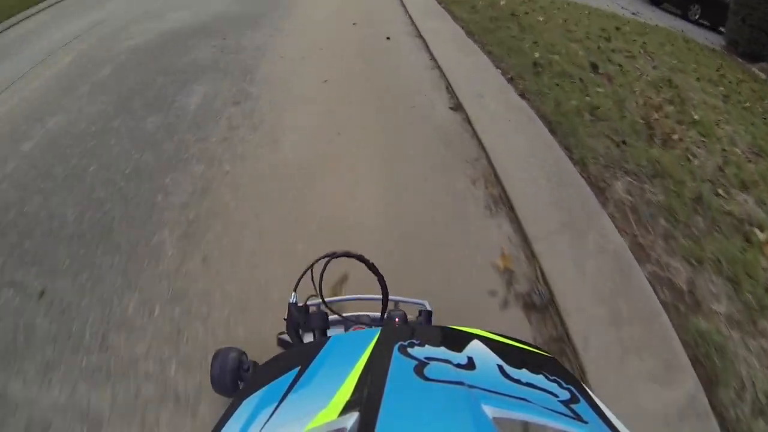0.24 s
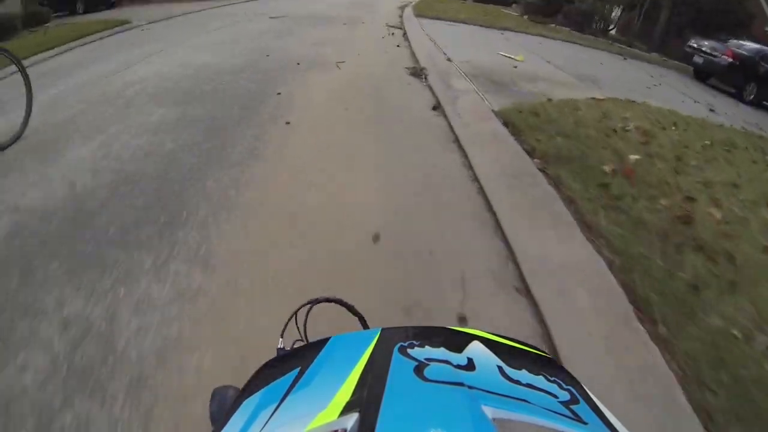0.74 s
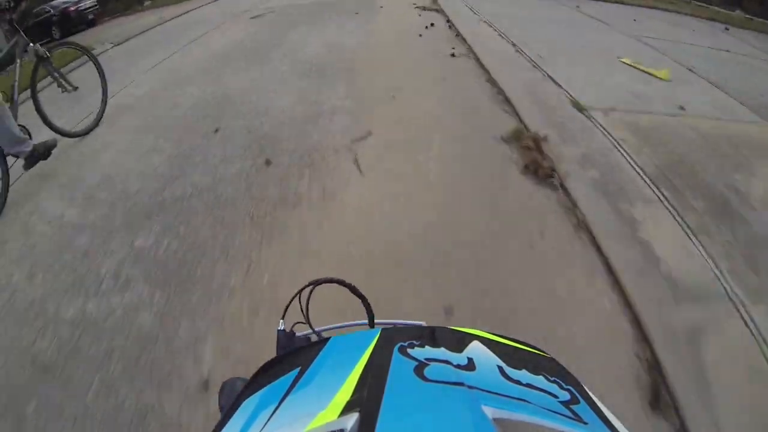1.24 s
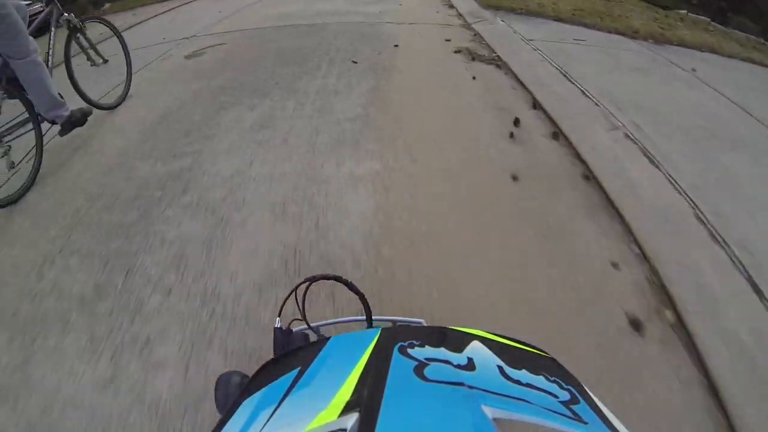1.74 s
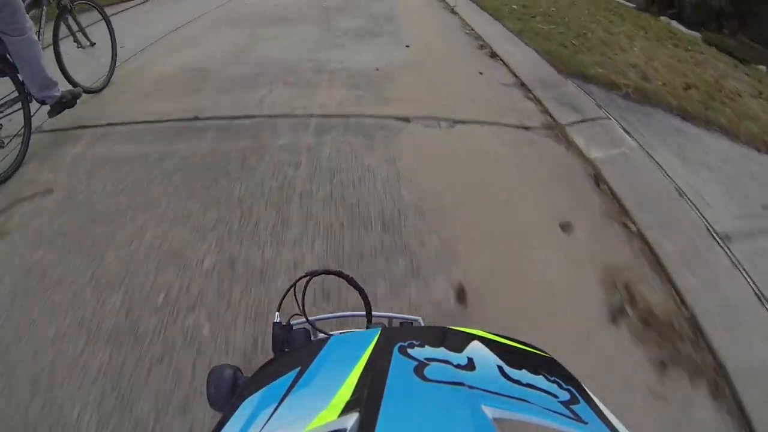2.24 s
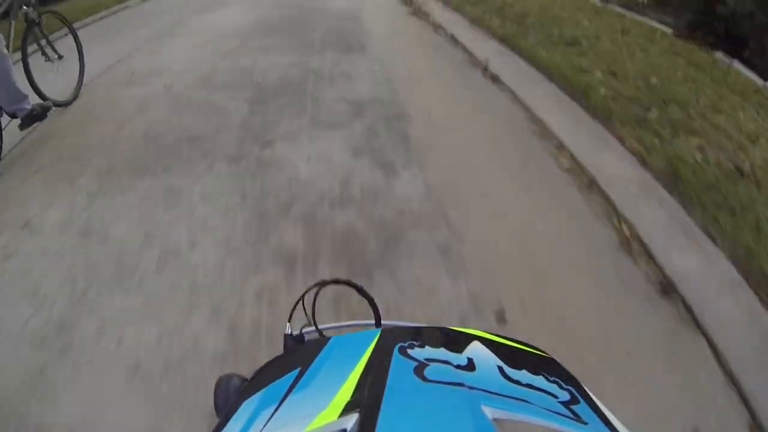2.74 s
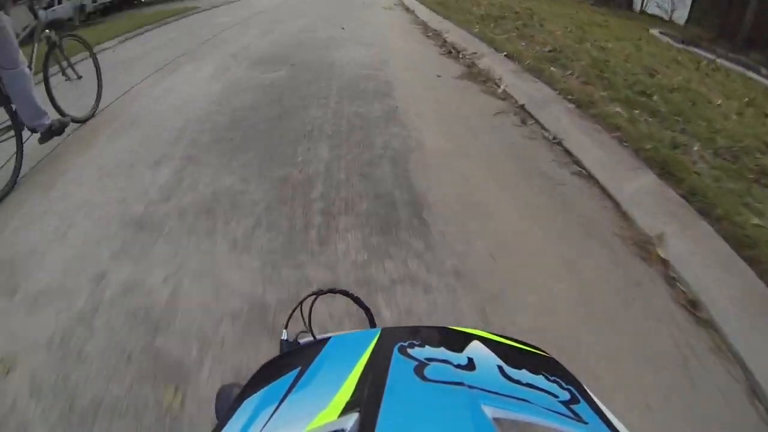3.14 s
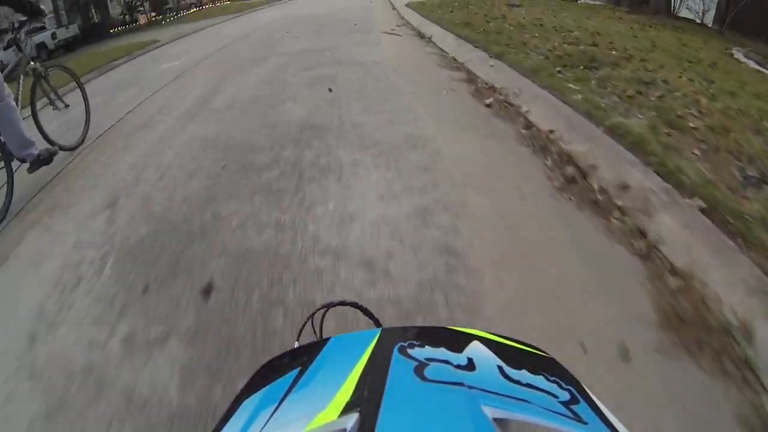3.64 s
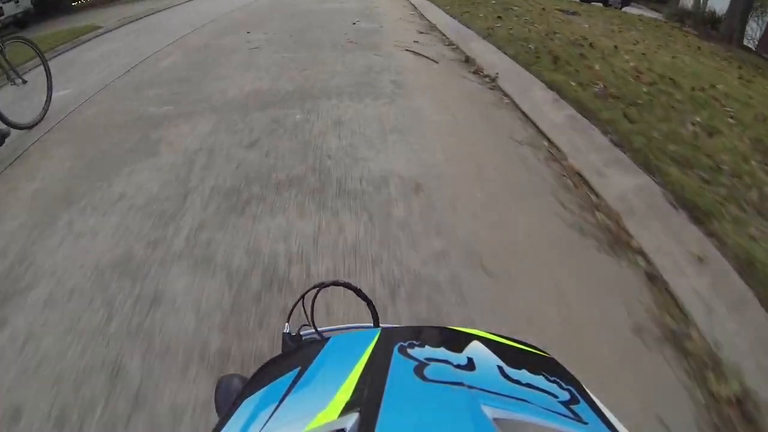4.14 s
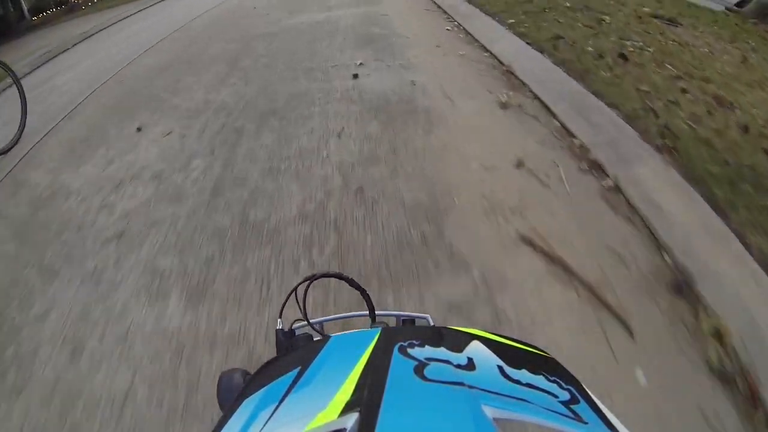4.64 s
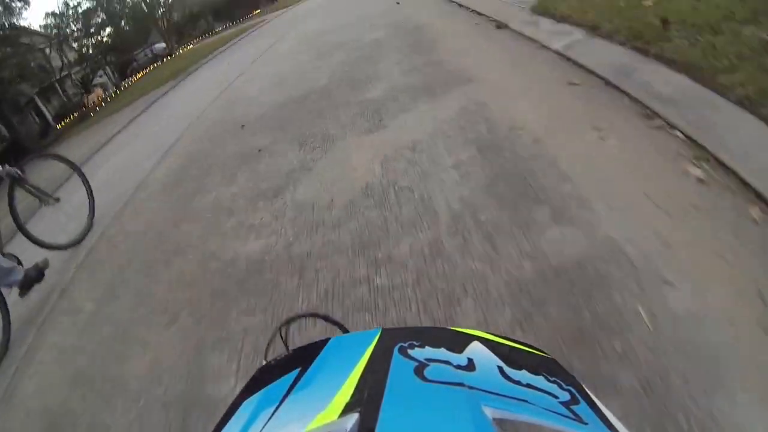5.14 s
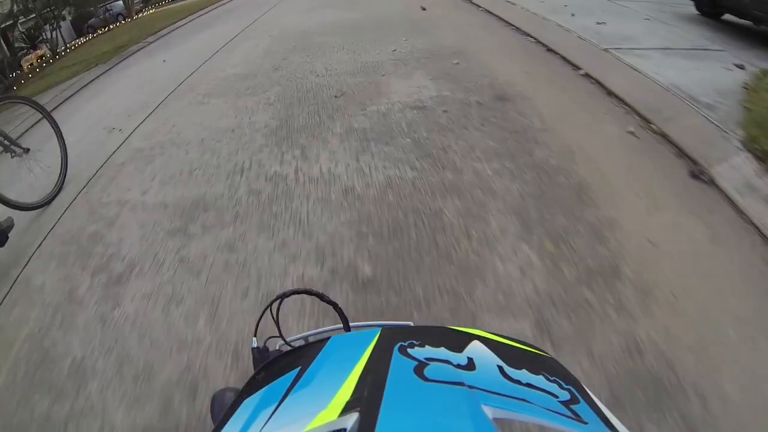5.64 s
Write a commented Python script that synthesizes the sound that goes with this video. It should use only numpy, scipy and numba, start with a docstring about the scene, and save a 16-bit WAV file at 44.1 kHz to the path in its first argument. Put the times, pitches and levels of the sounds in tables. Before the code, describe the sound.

An electric go-kart drives along a concrete street, heard from on board. Tyres drum steadily while plastic bodywork chatters and a chain jingles faintly. The motor whines in several pulls of the throttle, creeping upward in pitch. Bumps throw loose parts against the frame, with the hardest knocks and low booms near the middle. The whine drops out towards the end, leaving rumble, rattles and wind on the microphone.

```python
"""Tyres drum on rough concrete under a chattering fairing and a jingling chain: an electric go-kart,
heard from on board, with wind buffeting the microphone. Bumps throw loose parts against the frame
and leave low booms; once the frame hums faintly. The motor whines upward in pulls of the throttle,
and a limiter holds down the hardest jolts."""
import sys
import numpy as np
from scipy import signal
from scipy.fft import rfft, irfft
from scipy.io import wavfile
from scipy.ndimage import uniform_filter1d
from numba import njit

SR = 44100
rng = np.random.default_rng(int(sys.argv[2]) if len(sys.argv) > 2 else 0)


def transcribe(u):
    """Save the signal u as a 16-bit wav file named by the first command-line argument.

    u: samples, shape (n,) or (channels, n), limited to [-1, 1]; the rate is SR.
    q: integer samples, one column per channel.
    """
    v = np.clip(np.atleast_2d(u).T, -1, 1)
    q = np.round(v * 32767).astype(np.int16)
    wavfile.write(sys.argv[1], SR, q)


N = 259749


def undb(db):
    """Decibels to gain."""
    return 10 ** (np.asarray(db) / 20)


def unit(x):
    """Scale to rms 1."""
    return x / np.sqrt(np.mean(x ** 2))


def curves(table):
    """Columns of a timed table, linearly interpolated per sample."""
    times_s, *columns = np.transpose(table)
    return [np.interp(np.arange(N) / SR, times_s, column) for column in columns]


def drift(rate_hz):
    """Smooth random drift, rms 1."""
    step = max(int(SR / rate_hz), 1)
    held = np.repeat(rng.standard_normal(N // step + 1), step)[:N]
    return unit(uniform_filter1d(uniform_filter1d(held, step), step))


def contacts(per_s, scatter_db):
    """Random train of tiny, uneven impacts, rms 1."""
    hit = rng.random(N) < per_s / SR
    size = undb(scatter_db * np.clip(rng.standard_normal(N), -2, 2))
    return unit(hit * size * rng.choice([-1, 1], N))


def ring(force, modes, size=8192):
    """Force through a body's resonance clusters; minimum phase, unit power gain for white noise."""
    f = np.arange(size // 2 + 1) * SR / size + 1
    power = sum(undb(db) ** 2 / (1 + ((f * f - hz * hz) / (f * width_hz)) ** 2 / 3) ** 3
                for hz, width_hz, db in modes)
    cepstrum = irfft(np.log(power + 1e-12) / 2)
    response = irfft(np.exp(rfft(2 * cepstrum[:size // 2], size)))
    return signal.fftconvolve(force, response / np.linalg.norm(response))[:len(force)]


# Resonances of tyres, frame and seat: f/Hz, width/Hz, relative level/dB
FRAME_MODES = [(142.5, 35, -3), (228.5, 64, 0), (303, 39, 1), (345, 133, 0), (417, 58, -1), (491, 76, -1.5),
               (540, 64, -2), (615, 190, -7), (704, 56, -11.5), (839, 69, -4.5), (928, 72, -11.5),
               (1010, 100, -14), (1153, 70, -15), (1680, 870, -27)]


def tyres(rumble_db):
    """Concrete grain drums on the frame; the small wheels hop and load unevenly."""
    force = contacts(per_s=7000, scatter_db=1.5) * undb(rumble_db + 0.27 * drift(50) + 0.44 * drift(14))
    return ring(force, FRAME_MODES)


# Resonances of the plastic fairing and mount: f/Hz, width/Hz, relative level/dB
FAIRING_MODES = [(945, 390, 4), (1571, 240, 4.5), (1740, 170, -6.5), (1930, 262, 2.5), (2480, 390, -10),
                 (2918, 130, -7), (3120, 130, -9), (3326, 74, -9), (3590, 555, -14.5), (4810, 830, -23)]


def chatter(chatter_db):
    """Vibration keeps the fairing tapping in flurries over a gritty hiss."""
    flurry_db = 2.2 * drift(90)
    taps = contacts(per_s=900, scatter_db=-0.5) * undb(flurry_db - 4.5)
    grit = rng.standard_normal(N) * undb(-3.0)
    return ring((taps + grit) * undb(chatter_db), FAIRING_MODES)


# Resonances of chain, sprocket and fittings: f/Hz, width/Hz, relative level/dB
STEEL_MODES = [(5080, 320, 0), (6280, 690, -3.5), (8360, 690, -4), (9700, 1700, -12.5), (10500, 500, -16),
               (11100, 750, -11.5), (13260, 110, -8.5), (13000, 1300, -15.5)]
# Chain slaps on the sprocket: t/s, level/dB
CHAIN_SLAPS = [(0.07, -43.5), (0.375, -51), (0.885, -54), (1.17, -47), (1.2, -52), (1.218, -53),
               (1.985, -53), (2.252, -54), (2.345, -48), (2.383, -51), (2.5, -46), (2.665, -49),
               (3.019, -52), (3.245, -52.5), (3.63, -57), (3.83, -54), (3.905, -55), (4.425, -59),
               (4.46, -51), (4.59, -55), (4.89, -52), (4.915, -47), (4.966, -51), (5.044, -56),
               (5.178, -51), (5.37, -58), (5.868, -57)]


def jingle(chatter_db, offset_db=-31.5, slap_width_s=0.0068):
    """Shaken links and fittings tick, each resonance on its own, and swell at every chain slap."""
    t = np.arange(N) / SR
    shaking = undb(chatter_db + offset_db + 1.2 * drift(35))
    slaps = sum(undb(db) * np.exp(-((t - at_s) / slap_width_s) ** 2 / 2) for at_s, db in CHAIN_SLAPS)
    force = np.hypot(shaking, slaps) * undb(2.0 * drift(140))
    powers = np.array([width_hz * undb(db) ** 2 for _, width_hz, db in STEEL_MODES])
    out = np.zeros(N)
    for mode, share in zip(STEEL_MODES, powers / powers.sum()):
        ticks = unit(contacts(per_s=3600, scatter_db=3.0) * undb(2.5 * drift(30)))
        out += np.sqrt(share) * ring(ticks * force, [mode])
    return out


# Road shake, least where the wheels go light after a bump: t/s, rumble/dB, chatter/dB
ROAD_SHAKE = [(0.0, -16.5, -30.5), (0.23, -17.5, -30), (0.29, -24, -39), (0.38, -15.5, -23.5),
              (0.5, -20, -30), (0.7, -17, -29), (1.3, -17, -30), (1.95, -16, -29), (2.22, -17, -33),
              (2.27, -11.5, -24), (2.32, -17, -26), (2.49, -20.5, -27), (2.56, -22.5, -29.5),
              (2.7, -21.5, -33), (2.95, -16, -29), (3.3, -17, -32.5), (3.62, -18, -31), (3.9, -13, -27),
              (4.25, -18, -30.5), (5.1, -16.5, -30), (5.38, -15.5, -30), (5.62, -16.5, -27.5),
              (5.89, -20, -31)]


def rolling(patchy_db=1.39):
    """Coarse and smooth patches of concrete move rumble, chatter and jingle together."""
    rumble_db, chatter_db = np.array(curves(ROAD_SHAKE)) + patchy_db * drift(18)
    return tyres(rumble_db) + chatter(chatter_db) + jingle(chatter_db)


# Air on the microphone: t/s, level/dB
WIND_LEVEL = [(0.0, -27), (0.24, -33), (0.7, -23.5), (1.55, -22), (2.08, -16), (2.68, -30.5), (3.1, -22),
              (3.62, -18), (3.78, -22.5), (4.88, -20.5), (5.15, -26.5), (5.8, -18.5), (5.89, -18)]
# Eddy spectrum: f/Hz, relative density/dB
WIND_SPECTRUM = [(4, -36.5), (10, -9.5), (20, 5), (35, 2), (60, -1), (85, -5), (130, -11.5), (250, -33),
                 (800, -60)]


def wind(gust_db=0.9, gust_hz=9.6, cutoff_hz=1500):
    """Eddies at the microphone make a low, fluttering rumble."""
    (level_db,) = curves(WIND_LEVEL)
    hz, density_db = np.transpose(WIND_SPECTRUM)
    f = np.arange(N // 2 + 1) * SR / N + 1
    colour = undb(np.interp(np.log(f), np.log(hz), density_db)) / (1 + (f / cutoff_hz) ** 2)
    eddies = irfft(rfft(rng.standard_normal(N)) * colour, N)
    return unit(eddies) * undb(level_db + gust_db * drift(gust_hz))


def struck_spot(modes, detune=0.019, scatter_db=1):
    """A random point of contact shifts the pitch and strength of each resonance."""
    chance = np.clip(rng.standard_normal((len(modes), 2)), -2, 2)
    return [(hz * (1 + detune * a), width_hz, db + scatter_db * b)
            for (hz, width_hz, db), (a, b) in zip(modes, chance)]


def pits(per_s=5, clatter_db=-23, thud_db=-20.5, scatter_db=2.5, settle_s=0.016):
    """Pits and grit add small jolts at random; rows as in JOLTS."""
    chance = rng.random((64, 2))
    times_s = np.cumsum(0.5 + chance[:, 0]) / per_s
    sizes_db = scatter_db * (2 * chance[:, 1] - 1)
    return [(at_s, clatter_db + db, thud_db + db, 0, settle_s)
            for at_s, db in zip(times_s, sizes_db) if at_s + settle_s < N / SR]


# Jolts that throw loose parts against the frame: t/s, clatter/dB, thud/dB, hold/s, settle/s
JOLTS = [(0.037, -10, -9, 0.0052, 0.015), (0.079, -15, -12.5, 0.012, 0.028),
         (0.164, -18.5, -16, 0.041, 0.029), (0.217, -10.5, -10, 0.0085, 0.02),
         (0.323, -24, -14.5, 0.003, .012), (0.354, -18.5, -15, 0.022, 0.024),
         (0.4252, -10.5, -6, 0.0052, 0.0073), (0.645, -20, -16, 0.0053, 0.013),
         (1.042, -22, -17.5, 0.015, 0.0066), (1.1083, -15.5, -11.5, 0.031, 0.027),
         (1.1637, -12, -8.5, 0.012, 0.026), (1.197, -23, -12, 0.0092, 0.013),
         (1.2277, -19.5, -15.5, 0.0037, .008), (1.899, -18.5, -27, 0.0073, 0.017),
         (2.1197, -15.5, -8.5, 0.0016, 0.01), (2.2726, -3, -3, 0.0088, .0048),
         (2.345, -13.5, -8, 0.0093, 0.0096), (2.385, -17, -26, 0.0039, 0.0053),
         (2.432, -15.5, -10, 0.0034, 0.02), (2.486, -23.5, -19, 0.018, 0.028),
         (2.514, -13, -11.5, 0.013, 0.0059), (2.5834, -29, -11, 0, 0.013),
         (2.6485, -14.5, -4.5, 0.0034, 0.015), (2.8385, -30, -12, 0.0059, 0.0046),
         (2.9057, -16.5, -9.5, 0.0034, 0.019), (3.1755, -31, -15.5, 0.001, 0.013),
         (3.249, -23.5, -10.5, 0.0023, 0.023), (3.384, -24.5, -14.5, 0.014, 0.01),
         (4.205, -30, -11, 0.011, 0.0082), (4.3286, -22.5, -12, 0.016, 0.023),
         (4.564, -22.5, -11.5, 0.015, 0.025), (4.6454, -18, -11, 0.014, 0.018),
         (4.823, -18, -14, 0.0086, 0.0069), (4.9662, -9.5, -10.5, 0.01, 0.0082),
         (5.043, -13, -10.5, 0.0089, 0.02), (5.152, -16.5, -17.5, .028, 0.025),
         (5.188, -16.5, -14, 0.001, 0.013), (5.291, -22.5, -20, 0.032, 0.014),
         (5.345, -18, -21, 0.044, 0.024), (5.4422, -24, -13, 0.004, 0.011), (5.4575, -11, -7.5, 0, 0.014),
         (5.5765, -19, -6.5, 0.0011, 0.0065), (5.6222, -19, -22.5, 0.02, 0.017),
         (5.67, -18, -21, 0.0069, 0.021), (5.776, -12.5, -16, 0.0019, 0.017), (5.811, -23, -27, 0, 0.026),
         (5.857, -19, -14, 0.005, 0.0095), (5.872, -12.5, -15, 0.0071, 0.017)]


def jolts(rise_share=0.273, strike_s=0.0011, rebound_db=-5.5, clack_db=-22, knock_db=2):
    """A hard strike, then settling rebounds: the frame thuds, the fairing rattles, steel chinks."""
    clatter, thud, rattles, knocks = np.zeros((4, N))
    age = np.arange(SR // 5) / SR
    rebounds = contacts(per_s=7000, scatter_db=3.0)
    frame_hits = contacts(per_s=5900, scatter_db=3)
    steel_hits = contacts(per_s=7800, scatter_db=1.5)
    blow = np.sqrt(strike_s * SR)  # energy of strike_s of rebounds in one sample
    for at_s, clatter_db, thud_db, hold_s, settle_s in JOLTS + pits():
        rise_s = rise_share * settle_s
        start, strike = int((at_s - rise_s / 2) * SR), int((at_s + rise_s / 2) * SR)
        settling = np.exp(-np.maximum(age - hold_s, 0) / settle_s)
        burst = (np.minimum(age / rise_s, 1) * settling)[:N - start]
        span = slice(start, start + len(burst))
        clatter[span] += undb(clatter_db) * burst
        thud[span] += undb(thud_db) * burst
        knocks[strike] += undb(thud_db + knock_db) * blow
        force = undb(rebound_db) * burst * rebounds[span]
        force[strike - start] += undb(clack_db) * blow
        rattles[span] += undb(clatter_db) * ring(force, struck_spot(FAIRING_MODES), size=4096)
    thuds = ring(undb(-0.5) * thud * frame_hits + knocks, FRAME_MODES)
    chinks = ring(clatter * steel_hits, STEEL_MODES)
    return rattles + thuds + undb(-36.5) * chinks


# Single blows of fairing on frame: t/s, level/dB, pitch ratio
CLACKS = [(0.0397, -15, 1.05), (0.089, -12.5, 1.22), (0.181, -12, 1.06), (0.219, -9, 0.96),
          (0.358, -14, 1.16), (0.4273, -9, 0.86), (1.1085, -15, 0.8), (1.125, -10, 0.92), (1.167, -12, 1),
          (2.2722, -3.5, .96), (2.2758, -1.5, 1), (2.4312, -12, 1), (2.515, -14, 1), (2.649, -10.5, .85),
          (2.838, -19, .95), (4.648, -18, 0.87), (4.9697, -13, 1.03), (5.0497, -6, 0.91),
          (5.373, -15, 0.96), (5.672, -11, 0.91), (5.783, -17, 1)]


def clacks(blow_s=0.00065, width_share=0.56, frame_db=-5):
    """The fairing springs clear of a blow and rings longer than in a rattle; the frame adds body."""
    out = np.zeros(N)
    blow = signal.unit_impulse(SR // 10) * np.sqrt(blow_s * SR)  # energy of blow_s at rms 1
    body = undb(frame_db) * ring(blow, FRAME_MODES)
    for at_s, db, pitch in CLACKS:
        free_modes = [(hz * pitch, width_hz * width_share, mode_db)
                      for hz, width_hz, mode_db in struck_spot(FAIRING_MODES)]
        clack = ring(blow, free_modes, size=4096) + body
        start = int(at_s * SR)
        out[start:start + len(blow)] += undb(db) * clack[:N - start]
    return out


# Low booms after bumps, and one faint, lingering hum of the frame: t/s, level/dB, f/Hz, decay/s
FRAME_BOOMS = [(.205, -4.5, 309, 0.041), (1.115, -3.5, 307.6, 0.036), (1.62, -14, 300, 0.08),
               (2.271, 7, 617, 0.0063), (2.345, -1, 583, 0.012), (2.42, -6, 216, 0.012),
               (2.514, 12.5, 343, 0.008), (2.639, 2, 299, 0.012), (2.913, -10, 233, 0.046),
               (3.665, -4.5, 288.3, 0.03), (4.784, -6.5, 295.5, 0.021)]


def booms(swell_s=0.0097):
    """Each boom or hum is one low resonance that swells briefly, then fades."""
    out = np.zeros(N)
    age = np.arange(SR // 3) / SR
    for at_s, db, hz, decay_s in FRAME_BOOMS:
        start = int(at_s * SR)
        envelope = (1 - np.exp(-age / swell_s)) * np.exp(-age / decay_s)
        out[start:start + len(age)] += undb(db) * envelope * np.sin(2 * np.pi * hz * age)
    return out


# Whine pitch, set by motor speed: t/s, f/Hz
WHINE_PITCH = [(0.5, 357), (0.62, 373), (0.78, 384.6), (1.05, 398), (1.35, 412.3), (1.65, 426.8),
               (2.0, 421.6), (2.82, 434), (3.08, 416.6), (3.3, 428), (3.6, 442.6), (4.0, 459.2),
               (4.22, 465.7), (4.5, 451.6), (4.8, 472.7)]
# Pulls under load: start/s, end/s, build/s, level/dB, sag/(dB/s), speed wobble ratio, flutter/dB
THROTTLE_PULLS = [(0.492, 1.135, 0.12, -15.5, 3.5, 0.0071, 1.9), (1.177, 2.31, 0.11, -14, 15, 0.0067, 1.5),
                  (2.72, 2.887, 0.073, -22, 6, 0.0076, -2.5), (3.019, 3.427, 0.063, -14, 22, 0.013, 2),
                  (3.36, 4.248, 0.059, -23, -0.5, 0.01094, 1), (4.414, 4.83, .05, -21.5, 2, 0.0138, 3)]


def motor(fade_s=0.066, octave_db=-18.5):
    """Near-pure drive whine with a weak octave; the road shakes its speed and flutters its level."""
    (hz,) = curves(WHINE_PITCH)
    t = np.arange(N) / SR
    wobble, flutter, out = drift(50), drift(55), np.zeros(N)
    for start_s, end_s, build_s, db, sag_db_per_s, wobble_share, flutter_db in THROTTLE_PULLS:
        throttle = np.clip(np.minimum((t - start_s) / build_s, (end_s - t) / fade_s), 0, 1)
        phase = 2 * np.pi * np.cumsum(hz * (1 + wobble_share * wobble)) / SR
        whine = (np.sin(phase) + undb(octave_db) * np.sin(2 * phase)) * undb(flutter_db * flutter)
        out += unit(whine) * throttle * undb(db - sag_db_per_s * (t - start_s))
    return out


def scene():
    """Mono mix in open air; every source rides with the microphone."""
    return (rolling() + motor() + jolts() + clacks() + booms() + wind())[None]


@njit
def follow(x, attack_s, release_s):
    """One-pole envelope follower with separate rise and fall times."""
    out, level = np.empty(len(x)), 0.
    for i in range(len(x)):
        level += (x[i] - level) / (SR * (attack_s if x[i] > level else release_s))
        out[i] = level
    return out


def record(dry, threshold=0.41, lookahead_s=0.002, cutoff_hz=15000, fade_s=0.002):
    """The limiter ducks just ahead of loud peaks; then full-scale clipping, low-pass and edge fades."""
    t = np.arange(N) / SR
    envelope = follow(np.abs(dry[0]), attack_s=0.0027, release_s=0.12)
    ahead = np.interp(t + lookahead_s, t, envelope)
    limited = np.clip(dry * threshold / np.maximum(ahead, threshold), -1, 1)
    lowpass = signal.ellip(8, .2, 80, cutoff_hz, fs=SR, output="sos")
    edges = np.minimum(np.minimum(t, t[-1] - t) / fade_s, 1)
    return edges * signal.sosfilt(lowpass, limited)


dry = scene()
out = record(dry)
transcribe(out)
```